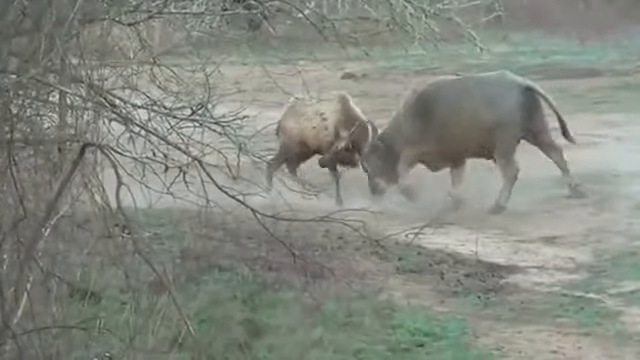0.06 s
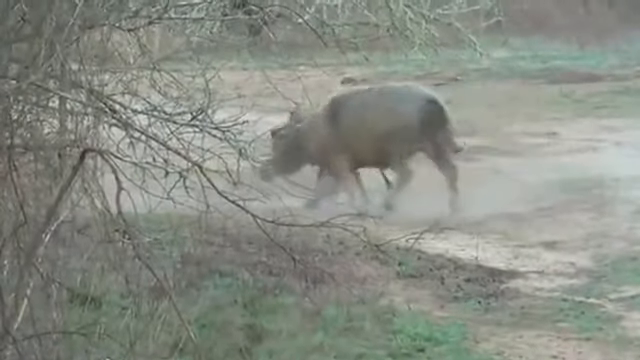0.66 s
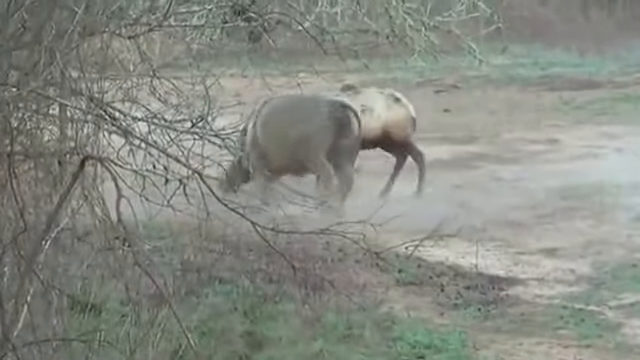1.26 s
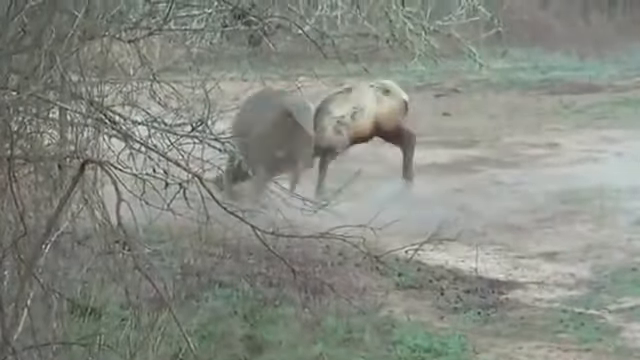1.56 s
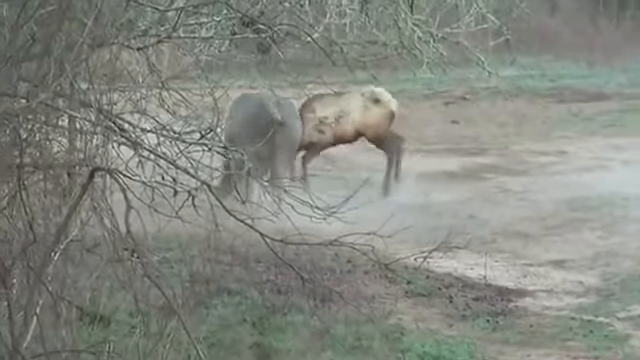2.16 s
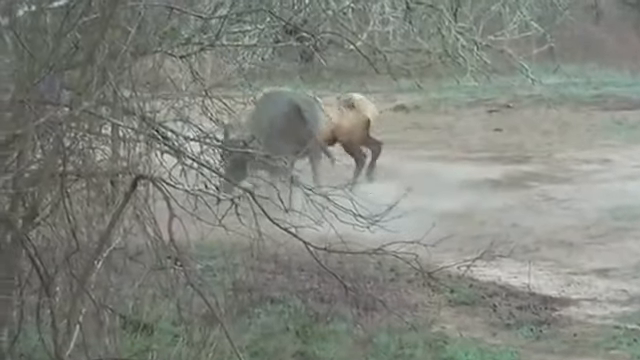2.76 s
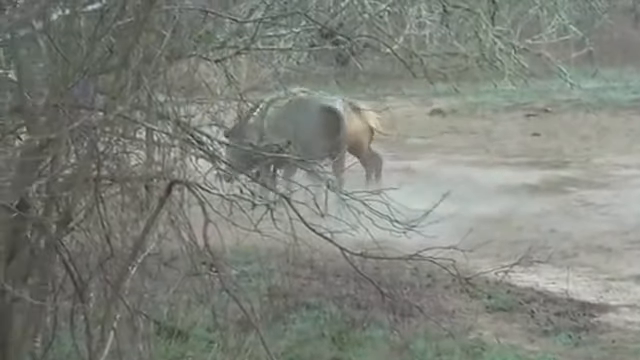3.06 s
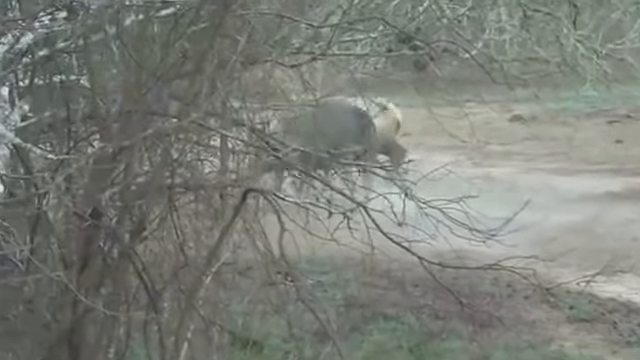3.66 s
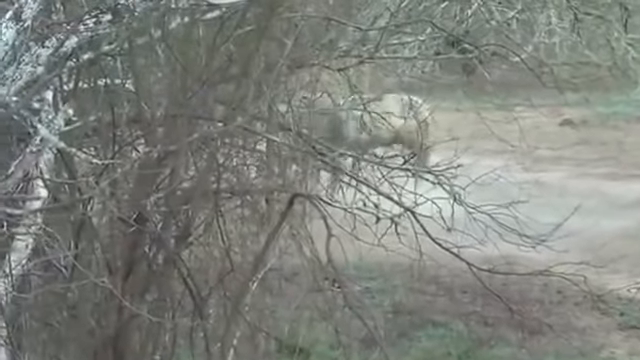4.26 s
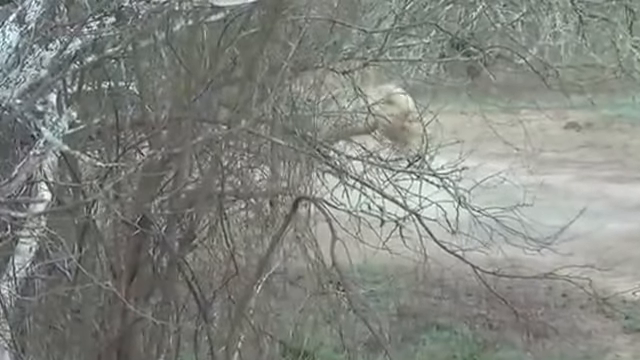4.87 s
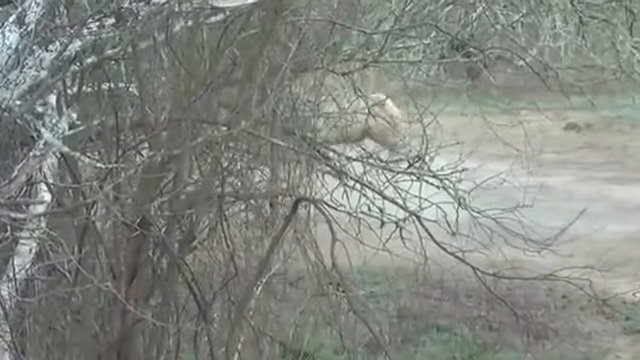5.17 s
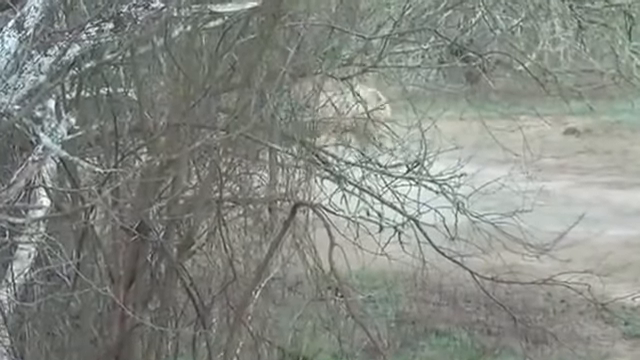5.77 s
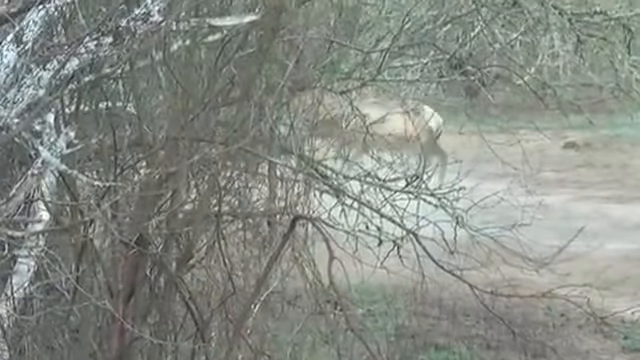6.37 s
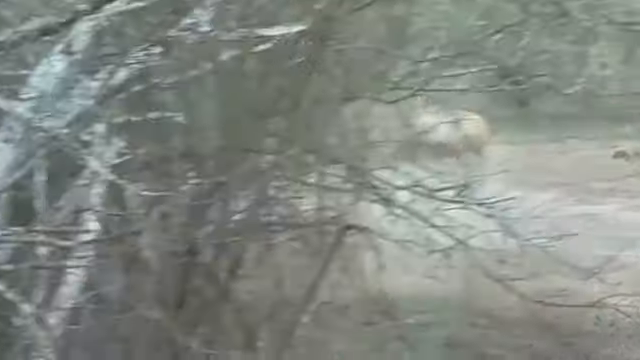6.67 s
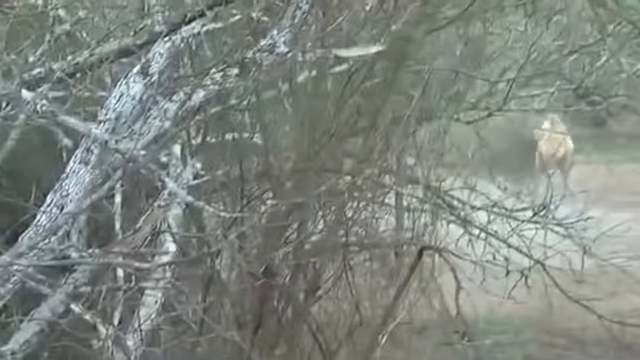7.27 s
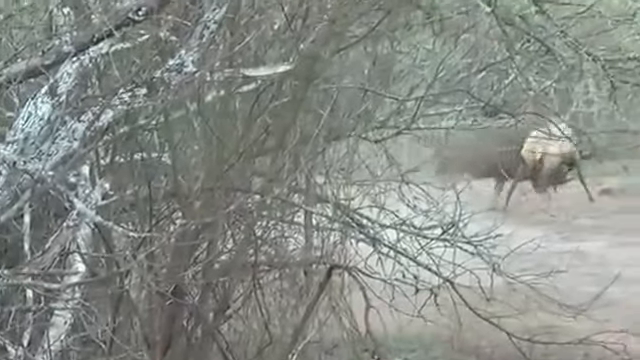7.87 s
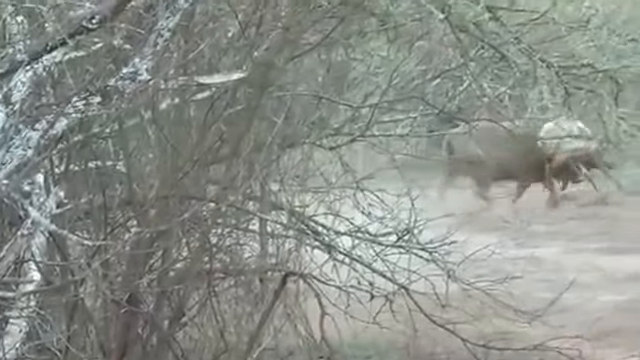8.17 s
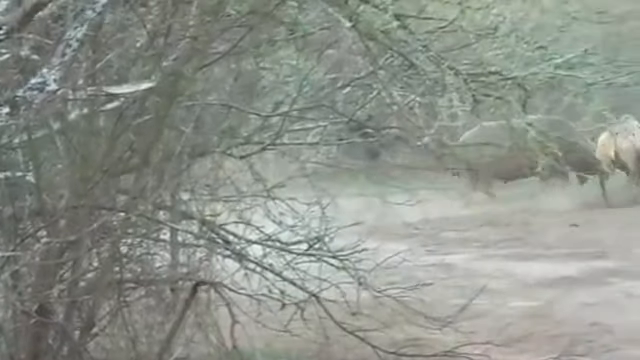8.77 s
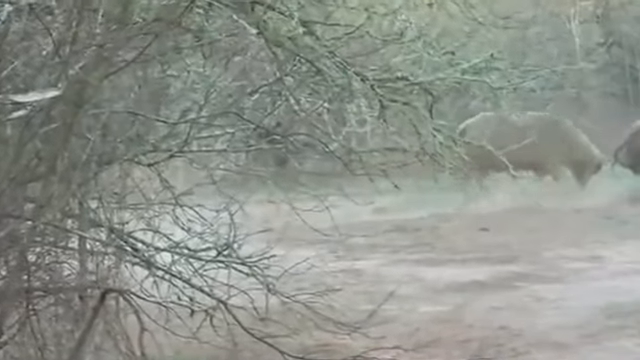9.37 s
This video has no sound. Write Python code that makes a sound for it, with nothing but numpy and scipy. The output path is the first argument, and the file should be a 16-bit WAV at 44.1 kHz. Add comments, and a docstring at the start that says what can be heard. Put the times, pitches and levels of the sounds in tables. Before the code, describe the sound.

A nearby songbird whistles rapid sweeping phrases while other birds answer and two sparring animals occasionally clack horns, over low outdoor rumble.

```python
"""A thicket by a dusty clearing, over steady rumble, drone and hiss; trunks and twigs scatter the song.
From 0.1 s a near songbird whistles five sweeping phrases and another answers with upslurs.
From 0.6 s two sparring animals clack horns now and then. Slides, churrs, a warble and thin chips follow.
At 5.2 s the near bird sings five more phrases; faint far hoots join at 6.2 s.
From 8 s the upslurs return, then soft high arches and a hidden bird's downslurs."""
import sys
import numpy as np
from scipy import signal
from scipy.fft import rfft, irfft, next_fast_len
from scipy.io import wavfile
from scipy.ndimage import uniform_filter1d, map_coordinates

SR = 44100
rng = np.random.default_rng(int(sys.argv[2]) if len(sys.argv) > 2 else 0)


def wrap_up_sound(samples):
    """Save the sound to the file named by the first command line argument, as 16-bit audio."""
    columns = np.atleast_2d(samples).T
    # keep every value between -1 and 1, then stretch to whole-number steps
    tamed = np.clip(columns, -1, 1)
    steps = np.round(tamed * 32767).astype(np.int16)
    wavfile.write(sys.argv[1], SR, steps)


N = 420273

# Note contours: t/s into the note, f/Hz, level/dB
LEAD_SHAPE = [(0, 2060, -4), (.023, 1980, -2), (.048, 1950, -7)]
LOW_SHAPE = [(0, 2785, -4), (.006, 2427, -1.5), (.015, 2345, -1.5), (.028, 2280, -6), (.043, 2310, -18)]
SWEEP_SHAPE = [(0, 4750, -39), (.014, 4750, -10), (.026, 4750, -9), (.035, 4650, -2), (.042, 4470, -4),
               (.047, 4200, -3), (.052, 3800, -5.5), (.057, 3740, -7)]
SCOOP_SHAPE = [(0, 3020, 1), (.009, 2650, -3), (.022, 2500, 4.5), (.035, 2520, -6)]
LIFT_SHAPE = [(0, 3080, -1), (.005, 2700, -8.5), (.012, 2740, -1), (.019, 2880, -5), (.026, 3140, -0.5)]
TAIL_SHAPE = [(0, 2350, 1), (.016, 1900, -1.5), (.034, 1660, -7.5)]
UPSLUR_SHAPE = [(.003, 2400, -11), (.016, 2954, -1), (.028, 3500, 5), (.034, 4150, 0), (.039, 5100, -18)]
TUT_SHAPE = [(0, 2250, -11), (.014, 2104, 0.5), (.03, 1990, -6)]
CHURR_SHAPE = [(0, 2456, -4), (.015, 2734, -4), (.027, 2953, 3.5), (.04, 2600, -1.5), (.058, 2054, -1.5)]
DOWNSLUR_SHAPE = [(0, 5054, -13), (.018, 4200, -7.5), (.036, 3600, -6.5), (.05, 3355, -7), (.06, 3170, 1),
                  (.072, 3053, -15)]
DROP_SHAPE = [(0, 4453, -18), (.014, 4425, -1), (.032, 4398, -7), (.05, 4250, -35), (.067, 3950, 2.5),
              (.08, 3450, -1.5), (.09, 2910, 4), (.108, 2757, -3)]
SLIDE_SHAPE = [(0, 2645, 0), (.025, 2380, 0), (.05, 2100, 1.5), (.08, 1923, -6), (.125, 1780, -5),
               (.145, 1720, -18)]
CHIP_SHAPE = [(0, 5910, -3.5), (.005, 6770, -2.5), (.011, 7450, -8), (.02, 7970, -8)]
ARCH_SHAPE = [(0, 6250, -1), (.011, 6980, -4), (.024, 7030, -13), (.036, 6900, -8), (.045, 6360, -11)]
# Near bird: t/s, effort/dB, sweep pitch ratio, note spacing ratio
NEAR_PHRASES = [(.131, -3.5, 1, .92), (.471, 0, 1, 1.02), (.814, .5, 0.99, 1), (1.165, 1, 0.97, .98),
                (1.521, .5, 0.97, .95), (5.188, -6.5, 0.95, 0.91), (5.524, -1, 1.015, .99),
                (5.866, -1, .97, 1.07), (6.213, -0.5, .97, 1.05), (6.57, -1.5, .96, 1.05)]
# Runs of upslurs: start/s, end/s, gap/s, gap growth per call/s
UPSLUR_BOUTS = [(.283, 2.65, .2185, .003), (8.019, 9.42, .2238, 0)]
# Farther birds' calls: t/s, level/dB, pitch ratio
CHURR_CALLS = [(2.845, -47, 1.05), (2.985, -51, 0.9), (3.183, -52, 0.94), (3.55, -49, 1.03),
               (5.28, -40.5, 1.07), (5.597, -42.5, 1.02), (5.92, -43, 1), (6.245, -43.5, 0.99),
               (6.56, -44.5, 1.01)]
DOWNSLUR_CALLS = [(8.7, -41, 1.01), (8.944, -40, 1.02), (9.186, -39, 1), (9.426, -39, 0.99)]
DROP_CALLS = [(1.872, -48, 0.96), (2.558, -47, 0.99), (4.915, -59, 0.95), (6.743, -55, 0.98),
              (7.511, -48.5, 0.96), (8.177, -47, 0.99)]
CHIP_CALLS = [(4.324, -50, 1), (4.917, -42, 1), (5.357, -54.5, 1), (6.757, -39, 0.96), (9.012, -37.5, 0.97)]
ARCH_CALLS = [(8.599, -60, 1), (8.679, -59, 0.98), (8.756, -58, 1.02), (8.835, -61, 0.95)]
WARBLE_CONTOUR = [(3.345, 2584, -51), (3.363, 2310, -45), (3.373, 2204, -47), (3.391, 2054, -50),
                  (3.443, 1945, -50), (3.547, 1872, -58), (3.609, 2258, -53), (3.615, 2260, -57)]  # one sagging whistle: t/s, f/Hz, level/dB
PLAIN_SLURS = [(0.046, 0.097, 3790, 2565, -51.5), (2.096, 0.32, 4420, 2665, -56),
               (3.255, .075, 2480, 1900, -44.5), (3.355, 0.047, 2860, 2790, -50),
               (3.5, .035, 2620, 2390, -45.5), (3.611, 0.061, 2450, 3220, -55),
               (3.717, 0.049, 3200, 2390, -50), (3.76, 0.046, 3450, 3000, -53),
               (3.818, 0.13, 3050, 2190, -65), (4.439, 0.29, 5930, 4070, -61),
               (4.702, .28, 4060, 2720, -52), (7.234, 0.083, 3240, 2570, -52),
               (7.809, 0.063, 3150, 2465, -47), (1.648, 0.045, 9200, 7300, -56),
               (5.757, 0.013, 8200, 6560, -48.5), (9.502, 0.016, 8400, 7000, -53.5)]  # gliding whistles: t/s, length/s, start f/Hz, end f/Hz, level/dB
FAR_HOOTS = [(6.166, 0.086, -59, 480.2), (6.575, 0.036, -66, 492), (6.641, 0.22, -60, 478.1),
             (6.96, 0.087, -62.5, 477.5), (7.413, 0.188, -61, 477)]  # low notes: t/s, length/s, level/dB, f/Hz
TWITTER_SPANS = [(0, 9.5, 6, -62), (3.2, 3.8, 26, -56)]  # far birds: start/s, end/s, note rate/Hz, level/dB
# Weighting of the microphone's distortion harmonics: f/Hz, level/dB
DISTORTION_SPECTRUM = [(4000, -44), (8000, -58), (9300, -32), (11500, -34), (13500, -25), (15000, -26)]
TRUNK_ECHOES = [(.0047, -7), (.0093, -4.5), (.0142, -3.5), (.0185, -17), (.0245, -9), (.0315, -24)]  # reflections: delay/s, level/dB
HORN_CLACKS = [(.648, -42, 1734), (1.7698, -38.5, 2283), (2.015, -40, 2300), (2.894, -37.5, 1737),
               (4.272, -38, 1900), (4.6205, -36.5, 2040), (5.0622, -43.5, 3220), (5.7125, -41, 1280),
               (5.7227, -42, 1480), (7.3545, -49, 2197), (7.603, -50, 1798), (9.393, -49, 1537)]  # horn on horn: t/s, level/dB, ring f/Hz
# Noise spectra of horn crack, open air and microphone hiss: f/Hz, level/dB
CRACK_SPECTRUM = [(400, -27), (800, -13), (1400, 0.5), (2200, 3.5), (3500, -3), (4700, -13), (6000, -21),
                  (15000, -47)]
AIR_SPECTRUM = [(15, -14), (25, -7.5), (60, -3), (120, -5), (200, -4), (320, -6), (550, -6.5), (750, -9.5),
                (1000, -15.5), (1600, -16), (2700, -15), (4500, -19), (8000, -24.5), (15000, -36)]
HISS_SPECTRUM = [(7500, -37), (8600, -28), (9300, 0), (10500, -0.5), (12000, -5.5), (15000, -11.5)]
AIR_COHERENCE = [(170, 1), (300, 1), (550, 1), (1100, 0.77), (3000, 0.69), (5000, 1), (8000, 1)]  # stereo likeness of the air: f/Hz, left-right correlation
DRONE_TONES = [(68.55, 15.7, -66), (101, 11.3, -74), (159.5, 22.7, -65.5), (174.1, 10, -66.5),
               (480.5, 10, -76.5)]  # distant drone: f/Hz, width/Hz, level/dB
DRONE_SWELLS = [(1.301, -60.5, .25), (2.681, -61, 0.27), (4.651, -60.5, .3), (6.897, -62.5, .1),
                (7.75, -64.5, 0.22), (8.917, -57.5, 0.079)]  # brief rises of the drone: t/s, level/dB, half length/s


def amp(db):
    """Decibels to gain."""
    return 10 ** (np.asarray(db) / 20)


def unit_rms(x):
    """Scale to rms 1."""
    return x / np.sqrt(np.mean(x ** 2) + 1e-20)


def log_interp(points, hz):
    """Read (f/Hz, value) points on a log frequency axis."""
    points_hz, values = np.transpose(points)
    return np.interp(np.log(hz + 1), np.log(points_hz + 1), values)


def filtered(x, response):
    """Apply a frequency response by FFT."""
    n = x.shape[-1]
    padded = next_fast_len(n + 8192)
    return irfft(rfft(x, padded) * response(np.fft.rfftfreq(padded, 1 / SR)), padded)[..., :n]


def shaped_noise(spectrum, n):
    """Noise of a given spectrum, rms 1."""
    return unit_rms(filtered(rng.standard_normal(n), lambda hz: amp(log_interp(spectrum, hz))))


def wobble(rate_hz, n):
    """Smooth random curve of n samples."""
    knots = rng.standard_normal(int(n * rate_hz / SR) + 4)
    return map_coordinates(knots, [np.arange(n) * rate_hz / SR])


def add(track, start_s, sound):
    """Mix a sound into a track."""
    part = track[..., max(0, round(start_s * SR)):][..., :sound.shape[-1]]
    part += sound[..., :part.shape[-1]]


def panned(x, pan_db):
    """Mono to stereo; positive is left."""
    return x * amp([[pan_db / 2], [-pan_db / 2]])


def whistle(hz, db, distortion_db, waver, loud_db=-32, edge_s=.0021):
    """One whistled note: an unsteady sine, plus faint microphone distortion that grows with level."""
    t = np.arange(len(hz)) / SR
    phase = 2 * np.pi * np.cumsum(hz * (1 + waver * wobble(248.6, len(hz)))) / SR
    order = np.arange(2, 7)[:, None]
    weights = amp(log_interp(DISTORTION_SPECTRUM, order * hz) - 7.5 * (order - 4))
    distortion = np.sum(weights * np.sin(order * phase) * (order * hz < SR / 2), axis=0)
    tone = np.sin(phase) + amp(distortion_db + 1.1 * (db - loud_db)) * distortion
    return tone * amp(db) * np.clip(np.minimum(t, t[-1] - t) / edge_s, 0, 1)


def sing(shape, calls, distortion_db=0, waver=.004):
    """Whistle one contour at each call's time, level and pitch."""
    s, hz, db = np.transpose(shape)
    t = np.arange(int(s[-1] * SR)) / SR
    glide_hz = uniform_filter1d(np.interp(t, s, hz), size=200, mode="nearest")
    track = np.zeros(N)
    for start_s, call_db, ratio in calls:
        add(track, start_s, whistle(glide_hz * ratio, call_db + np.interp(t, s, db), distortion_db, waver))
    return track


def after(calls, delay_s, gain_db):
    """One follow-up note per call."""
    return [(s + delay_s, db + gain_db, ratio) for s, db, ratio in calls]


def trunks(x, echo_db, pan_db, spread_db):
    """Discrete trunk echoes, panned alternately about pan_db; they beat against each glide."""
    echoes = np.zeros((2, N))
    for k, (delay_s, db) in enumerate(TRUNK_ECHOES):
        add(echoes, delay_s, panned(amp(db + echo_db) * x, pan_db + spread_db * (-1) ** k))
    return echoes


def thicket(x, twigs_db, twigs_t60_s, wood_db, wood_t60_s, width):
    """Diffuse scatter: a short tail from twigs, a long one from the wood behind."""
    t = np.arange(SR) / SR
    wet = np.zeros((2, N))
    for db, t60_s in ((twigs_db, twigs_t60_s), (wood_db, wood_t60_s)):
        tail = rng.standard_normal((2, SR)) * amp(-60 * t / t60_s) * (1 - np.exp(-t / .0018))
        mid, side = signal.fftconvolve(x[None], tail / np.linalg.norm(tail[0]), axes=1)[:, :N]
        wet += amp(db) * np.array([mid + width * side, mid - width * side])
    return wet


def near_bird(pause_s=1):
    """Sweep, scoop, lift and tail, three times a second; two low notes link the phrases of a run."""
    sweeps = [(s, -31.5 + 1.63 * effort_db, ratio) for s, effort_db, ratio, _ in NEAR_PHRASES]
    song = sing(SWEEP_SHAPE, sweeps, waver=.0078)
    for shape, delay_s, db in ((SCOOP_SHAPE, .05, -40.5), (LIFT_SHAPE, .093, -29.5),
                               (TAIL_SHAPE, .152, -49)):
        notes = [(s + delay_s * stretch, db + effort_db, 1 + rng.normal(0, .0081))
                 for s, effort_db, _, stretch in NEAR_PHRASES]
        song += sing(shape, notes, waver=.01)
    linked = [now for last, now in zip(NEAR_PHRASES, NEAR_PHRASES[1:]) if now[0] - last[0] < pause_s]
    for shape, ahead_s, db in ((LEAD_SHAPE, .104, -50.5), (LOW_SHAPE, .06, -36.5)):
        notes = [(s - ahead_s, db + 1.7 * effort_db, .985 - .011 * effort_db)  # deeper with effort
                 for s, effort_db, _, _ in linked]
        song += sing(shape, notes)
    echoes = trunks(song, echo_db=-1.5, pan_db=-4.5, spread_db=3)
    scatter = thicket(song, twigs_db=-6, twigs_t60_s=.16, wood_db=-3.5, wood_t60_s=.99, width=.34)
    return amp(-3.5) * (panned(song, pan_db=8) + echoes + scatter)


def upslurs(first_db=-46.5, fade_per_call_db=.46, first_gap_s=.172):
    """Two fading bouts of rising calls, the first slowing; a soft low note follows each call."""
    calls = []
    for start_s, end_s, gap_s, growth_s in UPSLUR_BOUTS:
        k = np.arange(int((end_s - start_s) / gap_s) + 1)
        times_s = start_s + np.append(0, first_gap_s + gap_s * k + growth_s * k ** 2 / 2)
        calls += [(s, first_db - fade_per_call_db * i, 1) for i, s in enumerate(times_s[times_s < end_s])]
    tuts = after(calls, delay_s=.103, gain_db=-7.5)
    return sing(UPSLUR_SHAPE, calls, distortion_db=7) + sing(TUT_SHAPE, tuts)


def warble(gain_db=4.5):
    """A long whistle that sags and rises again."""
    s, hz, db = np.transpose(WARBLE_CONTOUR)
    t = np.arange(s[0], s[-1], 1 / SR)
    glide_hz = uniform_filter1d(np.interp(t, s, hz), size=300, mode="nearest")
    track = np.zeros(N)
    add(track, s[0], whistle(glide_hz, np.interp(t, s, db) + gain_db, distortion_db=-2, waver=.0073))
    return track


def answering_birds():
    """Upslurs, churrs, a warble and plain slurs from deeper in the thicket."""
    song = upslurs() + sing(CHURR_SHAPE, CHURR_CALLS) + warble()
    for s, length_s, start_hz, end_hz, db in PLAIN_SLURS:
        progress = np.linspace(0, 1, int(length_s * SR))
        glide_hz = end_hz + (start_hz - end_hz) * (1 - progress) ** 1.4
        swell_db = db - 9 * (2 * progress - 1) ** 2
        add(song, s, whistle(glide_hz, swell_db, distortion_db=-6, waver=.011))
    scatter = thicket(song, twigs_db=-4, twigs_t60_s=.11, wood_db=-6, wood_t60_s=.87, width=.3)
    return amp(-1.5) * (panned(song, pan_db=-4) + scatter)


def hidden_bird():
    """Downslurs, drops and slides behind dense brush, heard mostly as scatter."""
    song = sing(DOWNSLUR_SHAPE, DOWNSLUR_CALLS, waver=.013) + sing(DROP_SHAPE, DROP_CALLS)
    song += sing(SLIDE_SHAPE, after(DROP_CALLS, delay_s=.162, gain_db=-3), waver=.011)
    echoes = trunks(song, echo_db=-6, pan_db=-3, spread_db=1)
    scatter = thicket(song, twigs_db=-1, twigs_t60_s=.14, wood_db=.5, wood_t60_s=.75, width=.35)
    return amp(-3.5) * (panned(song, pan_db=4) + echoes + scatter)


def small_bird():
    """Thin high chips and a soft run of arched notes, smeared by twigs."""
    song = sing(CHIP_SHAPE, CHIP_CALLS, distortion_db=10) + sing(ARCH_SHAPE, ARCH_CALLS)
    scatter = thicket(song, twigs_db=4.5, twigs_t60_s=.13, wood_db=1, wood_t60_s=.56, width=.16)
    return amp(-2.5) * (panned(song, pan_db=7) + scatter)


def horns(attack_s=.0003, crack_t60_s=.018, ring_t60_s=.028):
    """Horn on horn: a dry crack and a short ring, pitched by where the horns meet."""
    t = np.arange(SR // 6) / SR
    track = np.zeros(N)
    for s, db, ring_hz in HORN_CLACKS:
        crack = shaped_noise(CRACK_SPECTRUM, len(t)) * amp(-60 * t / crack_t60_s)
        ring = np.sin(2 * np.pi * ring_hz * t) * amp(-60 * t / ring_t60_s)
        add(track, s, amp(db - 3) * (crack + ring) * (1 - np.exp(-t / attack_s)))
    scatter = thicket(track, twigs_db=-7.5, twigs_t60_s=.072, wood_db=-9.5, wood_t60_s=.53, width=.28)
    return track + scatter


def far_hoots(gain_db=3):
    """Soft low notes that swell and die away."""
    track = np.zeros(N)
    for s, length_s, db, hz in FAR_HOOTS:
        progress = np.linspace(0, 1, int(length_s * SR))
        swell_db = db + gain_db - 8 * (2 * progress - 1) ** 2
        add(track, s, whistle(np.full(len(progress), hz), swell_db, distortion_db=-20, waver=.01))
    return track


def twitter(centre_hz=2600, spread=.16, glide=.14, length_s=.06):
    """Short random slurs of far birds, thickest in one flurry."""
    track = np.zeros(N)
    progress = np.linspace(0, 1, int(length_s * SR))
    for start_s, end_s, rate_hz, db in TWITTER_SPANS:
        for s in np.arange(start_s, end_s, 1 / rate_hz):
            late, pitch, slope, loudness = rng.uniform(-1, 1, 4)
            hz = centre_hz * np.exp(2 * spread * pitch + 2 * glide * slope * (progress - .5))
            swell_db = db + 3 * loudness - 9 * (2 * progress - 1) ** 2
            add(track, s + late / rate_hz / 2, whistle(hz, swell_db, distortion_db=-10, waver=.012))
    scatter = thicket(track, twigs_db=0, twigs_t60_s=.12, wood_db=-3, wood_t60_s=1, width=.42)
    return amp(-3.5) * (panned(track, pan_db=-2) + scatter)


def air_rumble(level_db=-55.5, sway_db=.5, sway_hz=4.3):
    """Open-air noise, bass-heavy, widest at 1-3 kHz."""
    def mid_side_gains(hz):
        angle = np.arccos(np.clip(log_interp(AIR_COHERENCE, hz), -1, 1)) / 2
        return amp(log_interp(AIR_SPECTRUM, hz)) * [np.cos(angle), np.sin(angle)]

    mid, side = filtered(rng.standard_normal((2, N)), mid_side_gains)
    return unit_rms(np.array([mid + side, mid - side])) * amp(level_db + sway_db * wobble(sway_hz, N))


def drone_tone(centre_hz, width_hz):
    """Narrowband noise heard as a wavering tone, rms 1."""
    noise = rng.standard_normal(N)
    return unit_rms(filtered(noise, lambda hz: 1 / (1 + (2 * (hz - centre_hz) / width_hz) ** 2)))


def drone(sway_db=.4, sway_hz=2.52):
    """Distant low tones, each swaying in level on its own."""
    return sum(amp(db + sway_db * wobble(sway_hz, N)) * drone_tone(hz, width_hz)
               for hz, width_hz, db in DRONE_TONES)


def drone_swells():
    """One pitch of the drone swells and sinks now and then."""
    t = np.arange(N) / SR
    envelope = sum(amp(db) * np.exp(-((t - s) / half_s) ** 2) for s, db, half_s in DRONE_SWELLS)
    return drone_tone(centre_hz=173.8, width_hz=12) * envelope


def microphone_hiss(level_db=-69):
    """Steady noise, strongest near 10 kHz."""
    return amp(level_db) * shaped_noise(HISS_SPECTRUM, N)


def scene():
    """Birds and horns over the open-air background."""
    birds = near_bird() + answering_birds() + hidden_bird() + small_bird() + far_hoots()
    return birds + horns() + air_rumble() + drone() + microphone_hiss() + drone_swells() + twitter()


def record(dry):
    """Brick-wall low-pass at 15.05 kHz."""
    return filtered(dry, lambda hz: hz < 15050)


dry = scene()
out = record(dry)
wrap_up_sound(out)
```